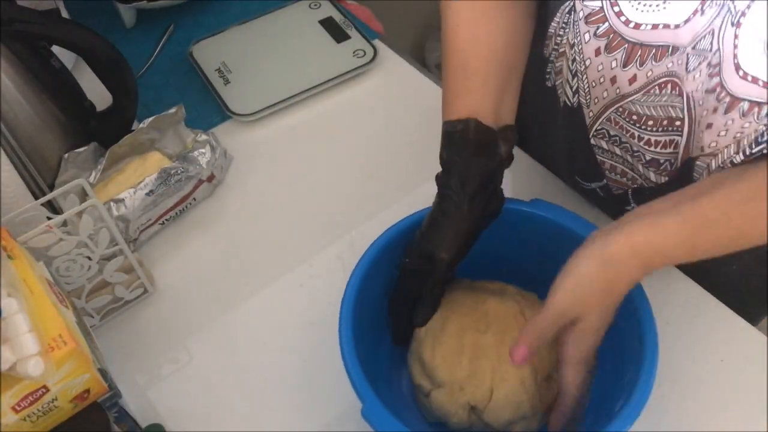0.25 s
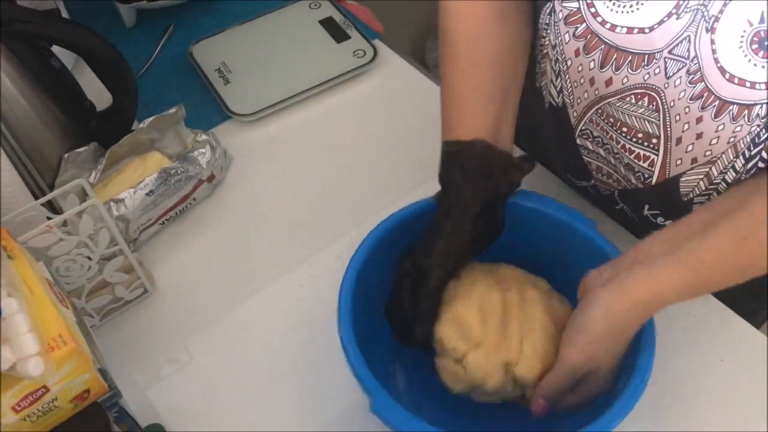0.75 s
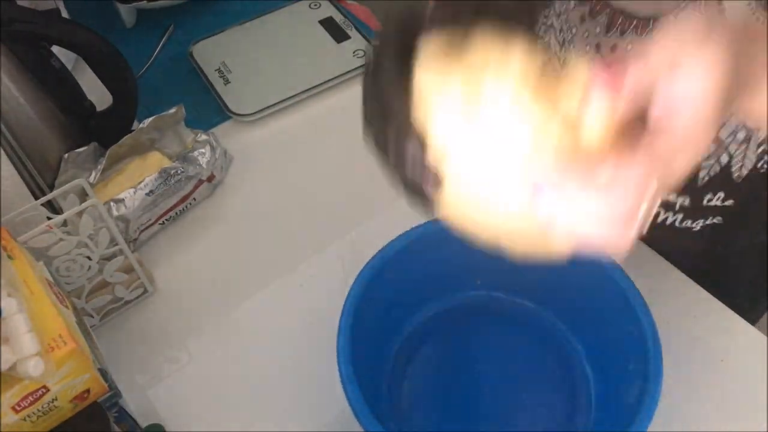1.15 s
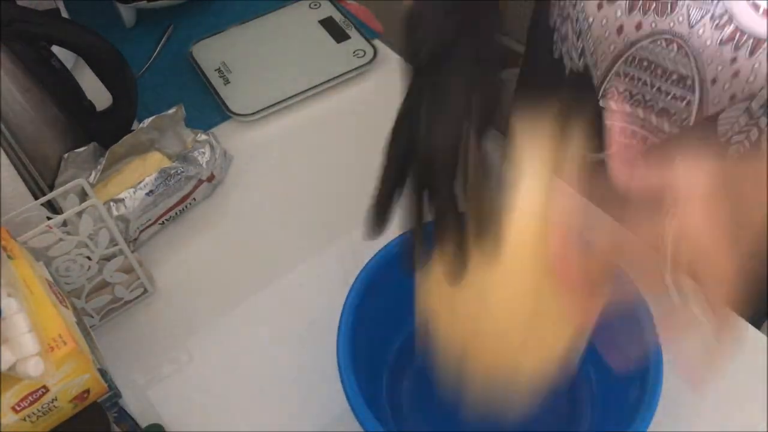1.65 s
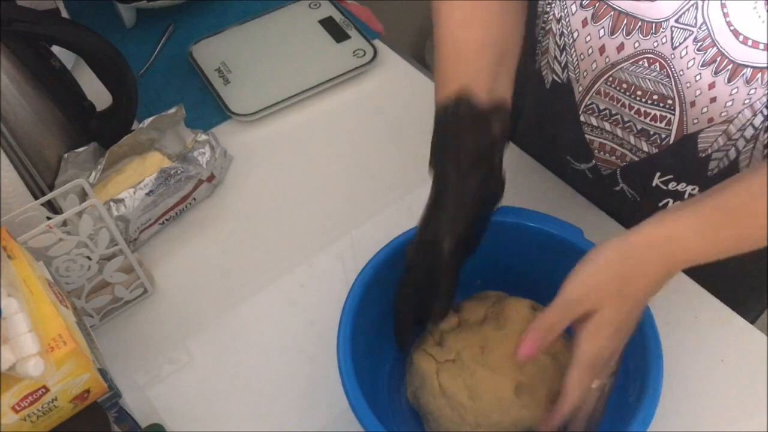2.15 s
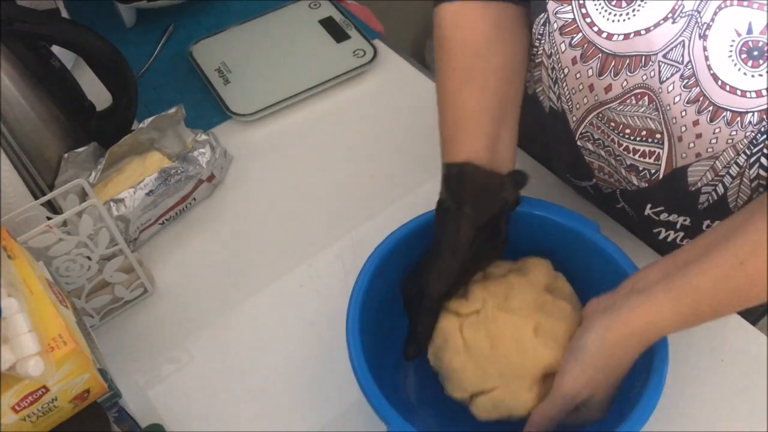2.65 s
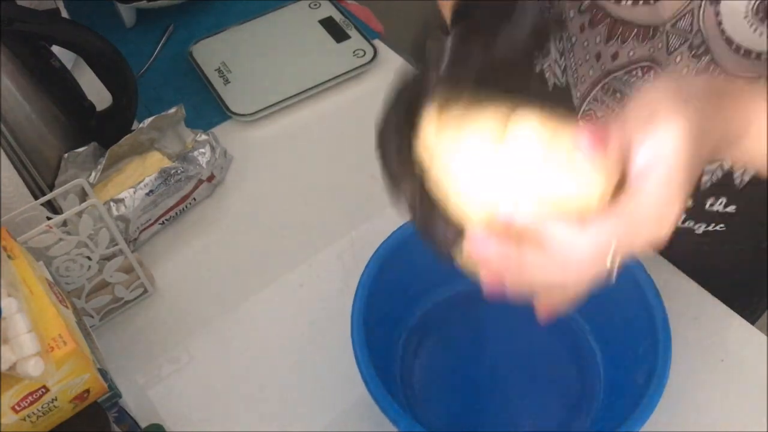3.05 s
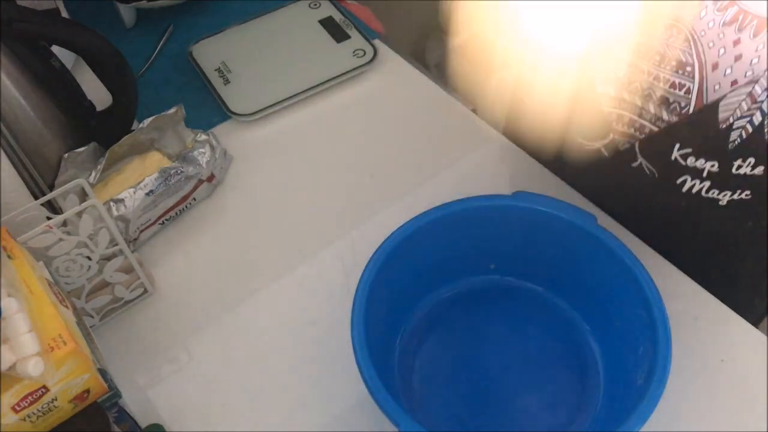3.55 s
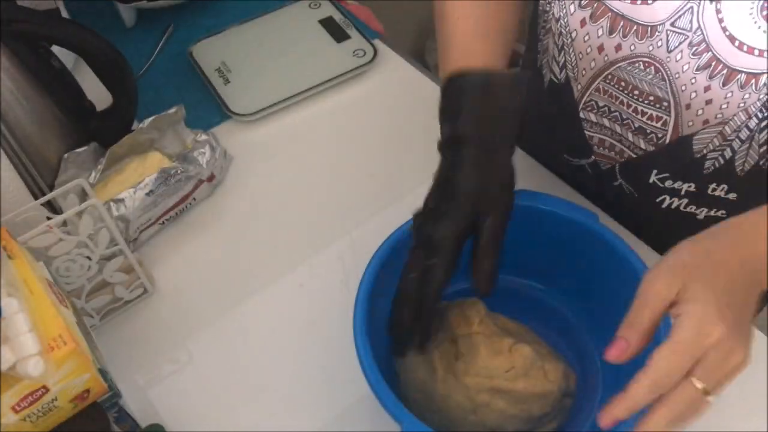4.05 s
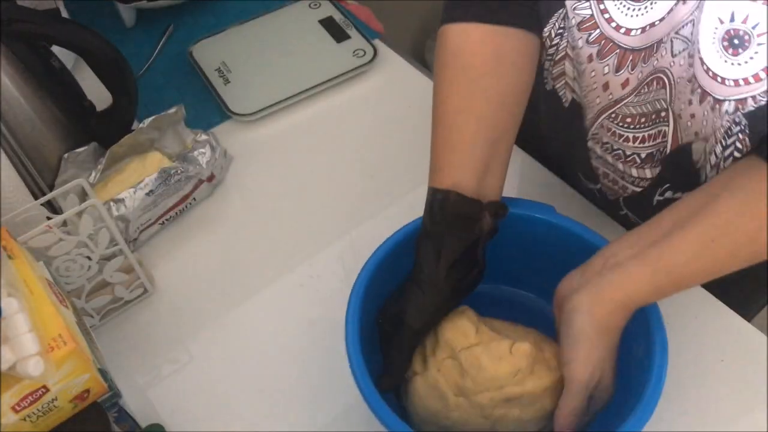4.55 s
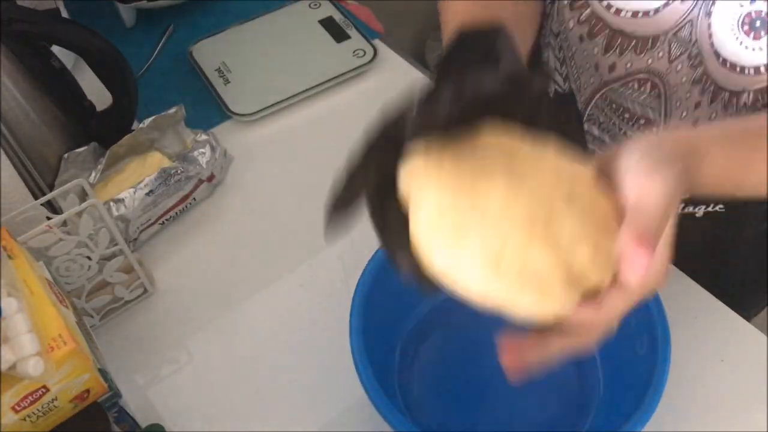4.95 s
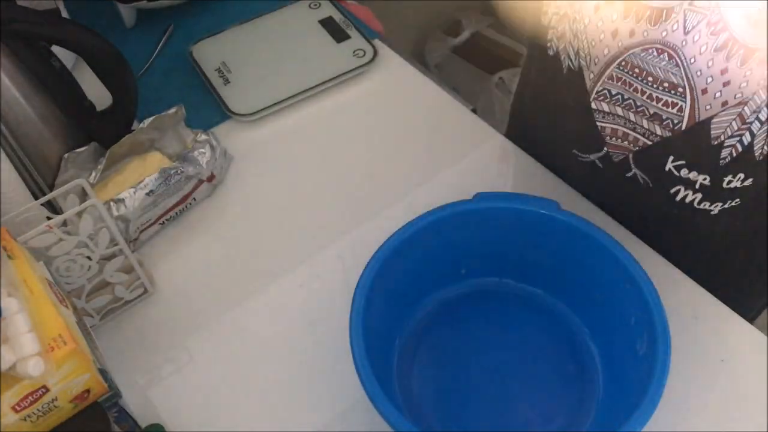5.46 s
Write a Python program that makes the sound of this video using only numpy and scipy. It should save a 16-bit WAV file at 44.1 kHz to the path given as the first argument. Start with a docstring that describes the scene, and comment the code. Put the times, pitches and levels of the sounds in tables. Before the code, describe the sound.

Soft dough is thrown three times into a plastic bowl with loud wet slaps, with light knocks and rustling between throws in an echoing kitchen.

```python
"""In a hard-walled kitchen, soft dough is lifted out of a plastic bowl and thrown back in, three times.
Each landing is a wet slap: a spatter of contacts rings the bowl's modes and one soft push thumps the counter.
Between throws fingers knock the bowl, the bowl rocks, and glove and sticky dough tick and rustle: short noise
bursts through modes and filters. Dense echoes of dying noise surround it, over the low drone of the house.
The microphone input drops the deepest bass, flattens loud peaks and cuts the top treble."""
import sys
import numpy as np
from scipy import signal
from scipy.fft import rfft, irfft
from scipy.io import wavfile

SR = 44100
rng = np.random.default_rng(int(sys.argv[2]) if len(sys.argv) > 2 else 0)


def bounce(signal):
    """Save signal as a 16-bit WAV file at the path given by the first command-line argument."""
    frames = np.transpose(np.atleast_2d(signal))
    limited = np.clip(frames, -1, 1)
    pcm = np.round(limited * 32767).astype(np.int16)
    wavfile.write(sys.argv[1], SR, pcm)


N = 250907  # length in samples


def from_db(db):
    """Gain of a level in dB."""
    return 10 ** (np.asarray(db) / 20)


def rms_one(x):
    """Scaled to unit rms."""
    return x / np.sqrt(np.mean(x ** 2) + 1e-20)


def at_hz(points, hz):
    """A (f/Hz, value) table read on a log-frequency axis."""
    points = np.array(points)
    return np.interp(np.log(np.maximum(hz, 1)), np.log(points[:, 0]), points[:, 1])


def colour(x, spectrum):
    """Filters by a spectrum, keeping the power of white input; minimum phase, so nothing sounds early."""
    hz = np.linspace(0, 1, 1025) * SR / 2
    cepstrum = irfft(np.log(rms_one(from_db(at_hz(spectrum, hz)))))
    # fold the cepstrum onto positive time: this makes the filter minimum phase
    cepstrum[1:1024] *= 2
    cepstrum[1025:] = 0
    impulse = irfft(np.exp(rfft(cepstrum)))
    return signal.fftconvolve(x, impulse)[:N]


def drift(rate):
    """Slow random wander of unit rms: twice-smoothed noise; a higher rate wanders faster."""
    step, settle = 40, 2000  # samples per slow value, slow values discarded
    r = np.exp(-2 * np.pi * step * rate / SR)
    white = rng.standard_normal(N // step + settle + 2)
    slow = signal.lfilter([1], [1, -2 * r, r * r], white)[settle:]
    return np.interp(np.arange(N) / step, np.arange(len(slow)), rms_one(slow))


def body(force, modes):
    """Decaying resonances in parallel; white force of rms 1 gives about rms 1 out."""
    out, power = np.zeros(len(force)), 0
    for k, (hz, level_db, t60) in enumerate(modes):
        r = from_db(-60 / (max(t60, .005) * SR))
        w = 2 * np.pi * hz / SR
        ring = signal.lfilter([0, np.sin(w)], [1, -2 * r * np.cos(w), r * r], force + 1e-18)
        out += (-1) ** k * from_db(level_db) * ring  # neighbours alternate in sign
        power += from_db(2 * level_db) / (2 * (1 - r * r))
    return out / np.sqrt(power)


def bursts(times, levels_db, t60s, rise_s):
    """Envelope of contacts that rise quickly and die away."""
    out = np.zeros(N)
    for s, level_db, t60 in zip(times, levels_db, t60s):
        t60 = np.clip(t60, .002, .3)
        start = round(s * SR)
        t = np.arange(min(int(t60 * SR), N - start)) / SR
        rise = 1 - np.exp(-t / max(rise_s, 1e-5))
        out[start:start + len(t)] += from_db(level_db - 60 * t / t60) * rise
    return out


def grains(per_s, size_db):
    """Random clicks of uneven size and either sign, rms 1."""
    sizes = from_db(size_db * np.minimum(rng.exponential(1, N), 4)) * rng.choice([-1, 1], N)
    return rms_one(sizes * (rng.random(N) < per_s / SR))


# spectrum of the house noise: (f/Hz, level/dB per Hz)
DRONE_SPECTRUM = [(12, -42), (20, 0.5), (134, 1.5), (446, -16.5), (678, -15.5), (1090, -21), (1480, -25),
                  (1760, -27), (2990, -36.5), (5230, -47.5), (7520, -48), (9140, -38.5), (13200, -53.5),
                  (16000, -40.5)]
DRONE_DB = -45.5


def drone():
    """House background: coloured noise, heavy in the bass, with a slightly lumpy level."""
    lumps = from_db(1.2 * drift(12))
    return from_db(DRONE_DB) * lumps * colour(rng.standard_normal(N), DRONE_SPECTRUM)


# how long the room rings: (f/Hz, t60/s)
ROOM_DECAY = [(160, 1), (420, 0.77), (1200, 1), (2000, 0.92), (4000, 0.93), (8000, 0.67), (15000, 0.17)]
FIRST_ECHO_S = 0.0042  # echoes enter at half this delay and are full at one and a half times it
CUPBOARDS_DB, CUPBOARDS_T60_S = 9, 0.23  # stronger early echoes from nearby surfaces


def kitchen(x):
    """Dense echoes: half-octave bands of noise, each dying at its own rate, under a quick early cluster."""
    t = np.arange(int(.9 * SR)) / SR
    white = rng.standard_normal((2, len(t)))
    edges = 40 * 2 ** np.arange(0, 9, .5)
    echoes = 0
    for k, (low, high) in enumerate(zip(edges, edges[1:])):
        band_pass = signal.butter(2, [low, high], "band", fs=SR, output="sos")
        band = signal.sosfilt(band_pass, white[k % 2])
        t60 = max(at_hz(ROOM_DECAY, np.sqrt(low * high)), .05)
        echoes = echoes + band * from_db(-60 * t / t60)
    early = 1 + from_db(CUPBOARDS_DB - 60 * t / CUPBOARDS_T60_S)
    gap = np.clip(t / FIRST_ECHO_S - .5, 0, 1)  # the walls answer after a short gap
    echoes *= early * gap
    return signal.fftconvolve(x, echoes / np.sqrt(np.sum(echoes ** 2)))[:N]


# swish as dough tears off the hands, one row per landing: (lead before landing t/s, level/dB)
# the swish holds 6 dB below the listed level
RELEASES = [(0.11, -33.5), (0.11, -37), (0.11, -34)]
RELEASE_SWELL_S, RELEASE_SWELL_DB, FALL_S = 0.05, 12, 0.0029


def releases():
    """Gain of the tearing swish: silent until its lead, then it swells, holds and stops at the landing."""
    t, out = np.arange(N) / SR, 0
    for (landing_s, *_), (lead_s, level_db) in zip(SLAPS, RELEASES):
        swell = np.clip((t - landing_s + lead_s) / RELEASE_SWELL_S, 0, 1)
        stop = np.clip((landing_s - t) / FALL_S, 0, 1)
        out = out + from_db(level_db - RELEASE_SWELL_DB * (1.5 - swell)) * swell * stop
    return out


# hands at work: (t/s, dough dragging on the wall level/dB, glove rustle level/dB)
HANDS = [(0.0, -53.5, -54), (0.34, -75, -58.5), (0.44, -54, -52), (0.86, -58.5, -53), (0.94, -45, -50),
         (1.09, -49, -54), (1.17, -74, -70), (1.45, -91, -66), (2.15, -80, -55.5), (2.32, -75, -51),
         (2.62, -55.5, -48.5), (2.75, -47, -63), (2.85, -64, -47.5), (3.0, -99, -66), (3.302, -66.5, -63),
         (3.5, -79, -66.5), (4.15, -80, -62.5), (4.3, -55, -55.5), (4.55, -59, -47.5), (4.7, -58, -55.5),
         (4.8, -50, -48), (4.96, -76, -54.5), (5.05, -74, -59.5), (5.3, -68, -71), (5.448, -85, -63),
         (5.69, -85, -72)]
# tone of glove and tearing dough: (f/Hz, level/dB per Hz)
RUSTLE = [(880, -47.5), (1500, -7), (2590, -1.5), (4870, -3.5), (7240, -5), (10000, -10.5), (12700, -7),
          (16000, -11)]
# modes of the free bowl wall: (f/Hz, level/dB, ring t60/s)
WALL = [(880, -22.5, 0.013), (966, -5, 0.042), (1036, -8.5, 0.087), (1142, 0, 0.019), (1330, 0, 0.046),
        (1430, -3.5, 0.054), (1492, -0.5, 0.046), (1632, -1.5, 0.044), (1774, -10, 0.072),
        (1987, 1.5, 0.022), (2245, 0, 0.02), (2320, -3.5, 0.02), (2495, -4.5, 0.02), (2747, -7.5, 0.051),
        (2966, -8, 0.032), (3230, -11.5, 0.013)]
# modes of the air and base of the bowl: (f/Hz, level/dB, ring t60/s)
HOLLOW = [(205, -2.5, 0.1), (429.6, 2.5, 0.055), (607, -5.5, 0.12), (653, -2, 0.063)]
HUM_UNDER_DRAG_DB = 11.5  # how far the hollow lies under the dragged wall
RELEASE_WALL_DB = -9.5  # share of the swish that rings the bowl


def hands():
    """Dragging dough excites the bowl in clumps; the glove hisses and crackles finely."""
    s, *levels_db = np.transpose(HANDS)
    drag, rustle = [from_db(np.interp(np.arange(N) / SR, s, db)) for db in levels_db]
    swish = releases()
    drag = drag + from_db(RELEASE_WALL_DB) * swish
    clumps = from_db(5.3 * drift(25)) * grains(1900, size_db=4.0)
    hiss = from_db(-1.0 + 2.88 * drift(30)) * grains(5000, size_db=3.0)
    tearing = from_db(2.5 * drift(70)) * grains(7000, size_db=2.5)
    crackle = from_db(-6.5) * grains(210, size_db=2.5)
    wall = body(drag * clumps, WALL)
    hollow = body(drag * clumps, HOLLOW) / from_db(HUM_UNDER_DRAG_DB)
    return wall + hollow + colour(rustle * (hiss + crackle) + swish * tearing, RUSTLE)


# dough shifting in the raised hands crackles faintly: (start t/s, end t/s)
SHIFTS = [(1.29, 1.48), (3.2, 3.45), (5.16, 5.33)]
SNAPS_PER_S = 150
SNAP_DB, SNAP_SPREAD_DB, SNAP_COLOUR_DB = -41, 3.5, 11  # mean level, spread of level, spread of brightness


def faint_ticks():
    """Random snaps while the dough shifts, each with its own strength and colour."""
    t = np.arange(N) / SR
    shifting = np.any([(t > start) & (t < end) for start, end in SHIFTS], axis=0)
    born = shifting & (rng.random(N) < SNAPS_PER_S / SR)
    strength, tint = rng.standard_normal((2, N))
    return np.transpose([t, SNAP_DB + SNAP_SPREAD_DB * strength, SNAP_COLOUR_DB * tint])[born]


# clearest snaps of dough and glove letting go: (t/s, level before filtering/dB, brighter over duller part/dB)
TICKS = [(0.7866, -27, -2), (0.9004, -26, 2), (0.9193, -27.5, 4), (1.056, -21, -14), (1.1936, -35, -1),
         (1.3407, -36, 15), (1.3962, -31, -9), (1.4182, -40, 5), (1.4437, -34, 10), (1.6528, -31.5, -18),
         (1.7345, -32, 11), (2.4737, -26.5, 3), (2.5416, -21, 0), (2.5728, -22.5, 10), (2.9416, -27, -3),
         (2.9663, -23.5, -11), (3.02, -30.5, -9), (3.1474, -34.5, -6), (3.2183, -45, 9), (3.275, -31, 15),
         (3.3529, -25.5, -0.5), (3.3855, -24.5, -4.5), (3.4059, -27.5, -6.5), (3.436, -32.5, -20),
         (3.472, -21, -5.5), (4.0746, -28, -10), (4.1521, -28.5, 11), (4.573, -19.5, -22), (4.5894, -40, 6),
         (4.709, -23.5, -5), (4.9377, -25, 5), (5.0119, -25.5, -6), (5.0468, -26.5, -12.5),
         (5.236, -25, -12), (5.25, -27.5, -20), (5.3643, -24.5, -11), (5.5194, -38, 1), (5.5881, -20, -8)]


def ticks():
    """Each snap is a tiny tear with a duller and a brighter part; the counter returns it a moment later."""
    s, level_db, bright_db = np.vstack([TICKS, faint_ticks()]).T
    t60 = rng.uniform(.003, .007, len(s))
    duller = (-np.maximum(bright_db, 0), [2400, 6200])
    brighter = (np.minimum(bright_db, 0), [6500, 15000])
    out = 0
    for part_db, band_hz in (duller, brighter):
        snaps = bursts(s, level_db + part_db, t60, rise_s=.00005) * rng.choice([-1, 1], N)
        out = out + signal.sosfilt(signal.butter(2, band_hz, "band", fs=SR, output="sos"), snaps)
    smear = rng.standard_normal(130) * np.hanning(130)
    reflection = np.r_[np.zeros(100), smear]  # delay in samples, then a short blur
    return out + from_db(-33.5) * signal.fftconvolve(out, reflection)[:N]


# the bowl rocks when the dough leaves it, and after a landing:
# (start t/s, length t/s, wall level/dB, hollow level/dB, fading/dB per s)
ROCKS = [(0.972, .195, -22, -29.5, 52), (1.952, .28, -21, -43, 33), (2.817, .07, -18, -28, 155),
         (3.903, .2, -22.5, -44, 43), (4.792, .11, -16, -20.5, 71)]
ROCK_S, ROCK_SPREAD_DB = 0.015, 2  # mean gap between bumps, unevenness


def rocks():
    """Soft bumps of the base ring mostly the middle modes of the free wall, and the hollow."""
    bumps = []
    for start, length, wall_db, hollow_db, fading in ROCKS:
        jitter, wall_luck, hollow_luck = rng.standard_normal((20, 3)).T
        after = ROCK_S * (np.arange(len(jitter)) + 0.246 * jitter)
        wall_levels = wall_db - fading * after + ROCK_SPREAD_DB * wall_luck
        hollow_levels = hollow_db - fading * after + ROCK_SPREAD_DB * hollow_luck
        bumps += list(np.transpose([start + after, wall_levels, hollow_levels])[after < length])
    s, wall_db, hollow_db = np.transpose(bumps)
    t60 = np.full(len(s), .015)
    # modes away from the centre are struck less, and all ring shorter
    middle = [(hz, db - 18 * np.log2(hz / 1480) ** 2, 0.69 * ring) for hz, db, ring in WALL]
    base = [(hz, db - 12 * np.log2(hz / 434) ** 2, 0.64 * ring) for hz, db, ring in HOLLOW]
    wall = body(bursts(s, wall_db, t60, rise_s=0.0013) * rng.standard_normal(N), middle)
    hollow = body(bursts(s, hollow_db, t60, rise_s=0.00083) * rng.standard_normal(N), base)
    return wall + hollow


# fingers and dough knocking the bowl: (t/s, wall level/dB, hollow level/dB, crack level/dB)
KNOCKS = [(0.396, -21, -26, -20.5), (0.4125, -30, -38, -29.5), (0.4427, -62, -37, -32),
          (0.5379, -45, -35, -26), (0.566, -58, -32, -34.5), (0.6712, -33, -53, -35.5),
          (0.6918, -28, -53, -36), (0.881, -22, -54, -26), (0.9436, -27, -49, -37), (0.9629, -14, -40, -22),
          (1.029, -36, -25, -33.5), (1.0711, -31.5, -24, -31.5), (1.086, -20.5, -31, -49),
          (2.3135, -30.5, -44, -24), (2.3245, -20, -50, -30), (2.3932, -40, -57, -31.5),
          (2.533, -26.5, -32, -26.5), (2.5604, -17.5, -57, -26.5), (2.721, -30, -39, -42),
          (2.7474, -36.5, -37, -37.5), (2.8073, -16.5, -34, -27), (2.815, -18, -19, -20.5),
          (4.247, -24.5, -48, -76), (4.2593, -26, -55, -41), (4.2837, -30, -58, -50),
          (4.3467, -25.5, -79, -28.5), (4.364, -21.5, -57, -35.5), (4.4212, -39, -46, -36),
          (4.5334, -40, -44, -31), (4.7373, -15, -20.5, -31.5), (4.778, -7.5, -7, -13.5),
          (4.826, -14.5, -22, -21.5), (5.5393, -42, -53.5, -40)]
# tone of the crack on top of knocks and slaps: (f/Hz, level/dB per Hz)
CRACK = [(1180, -5.5), (2000, -2.5), (3610, -5.5), (4260, -6), (5300, -14), (6360, -9), (7120, -14.5),
         (13400, -20.5), (16000, -14)]
KNOCK_T60_S, KNOCK_RISE_S = 0.029, 0.0011
KNOCK_ON_COUNTER_DB = -14  # share of the hollow's blow that passes through the base


def knocks():
    """Short contacts ring the wall, the hollow and the counter, with a crack on top."""
    s, wall_db, hollow_db, crack_db = np.transpose(KNOCKS)
    t60 = np.full(len(s), KNOCK_T60_S)
    contacts = grains(8000, size_db=2.5)
    wall = body(bursts(s, wall_db, 0.74 * t60, 2 * KNOCK_RISE_S) * contacts, WALL)
    blows = bursts(s, hollow_db, t60, rise_s=0.0043) * rng.standard_normal(N)
    hollow = body(blows, HOLLOW)
    counter = from_db(KNOCK_ON_COUNTER_DB) * body(blows, COUNTER[1:])  # without the deepest mode
    snap = bursts(s, crack_db, t60, KNOCK_RISE_S) * grains(14000, size_db=3.5)
    return wall + hollow + counter + colour(snap, CRACK)


# modes of the counter top: (f/Hz, level/dB, ring t60/s)
COUNTER = [(55.5, 10.5, 0.15), (145, -5.5, 0.32), (210.7, 2.5, 0.23)]


def thumps():
    """The weight of the dough is one soft, smooth push whose change rings the counter."""
    s, thump_db = np.transpose(SLAPS)[[0, 5]]
    weight = bursts(s + 0.0083, thump_db, np.full(len(s), .016), rise_s=0.014)
    return body(np.diff(weight, prepend=0), COUNTER)


# dough landings: (t/s, wall level/dB, wall tilt/dB per octave, hollow level/dB, wet crack level/dB,
# push on the counter level/dB, spreading t60/s, graze relative to wall level/dB)
SLAPS = [(1.8141, 2.5, -11, -15, -5.5, 39, 0.097, -19), (3.7618, 1, -5, -5.5, -3, 37.5, 0.06, -34),
         (5.678, 4.5, -18, -30, -1.5, 22, 0.043, -26)]
# change of each hollow mode with the dough lying on the base: one level/dB per mode
FILLED_DB = [-4, -6, 2, 2]


def slaps():
    """The dough grazes the bowl, then spreads over the base in a spatter of contacts."""
    s, wall_db, tilt_db, hollow_db, crack_db, _, t60, graze_db = np.transpose(SLAPS)
    damping, graze_s = .3, .01  # dough shortens the ring; the graze leads by graze_s
    spatter, wall = grains(9000, size_db=3.0), np.zeros(N)
    for k in range(len(SLAPS)):
        # the landing spot picks the modes, the dough damps them
        struck = [(hz, db + tilt_db[k] * np.log2(hz / 1000), damping * ring) for hz, db, ring in WALL]
        force = bursts(s[[k]], wall_db[[k]], t60[[k]], rise_s=0.0037)
        force += bursts(s[[k]] - graze_s, wall_db[[k]] + graze_db[k], [2 * graze_s], rise_s=0.00083)
        near = slice(round((s[k] - graze_s) * SR), round((s[k] + .5) * SR))
        wall[near] += body((force * spatter)[near], struck)
    filled = [(hz, db + change_db, 2 * damping * ring)
              for (hz, db, ring), change_db in zip(HOLLOW, FILLED_DB)]
    hollow = body(bursts(s, hollow_db, t60, rise_s=0.0037) * rng.standard_normal(N), filled)
    wet_crack = bursts(s, crack_db, t60, rise_s=0.00078) * grains(12000, size_db=-1.0)
    return wall + hollow + colour(wet_crack, CRACK)


SIDES = 4  # directions in which the splat leaves the bowl
KITCHEN_DB = -6  # echoes against direct sound
HANDLING_ECHO_DB = -4.5  # echo level of the handling sounds, lower than that of the slaps


def scene():
    """Everything at the bowl sounds into the kitchen; each side of a splat has its own spatter and echoes."""
    handling = knocks() + rocks() + ticks() + hands()
    handling_echoes = from_db(HANDLING_ECHO_DB) * kitchen(handling)
    slap_echoes = sum(kitchen(slaps()) for side in range(SIDES)) / np.sqrt(SIDES)
    direct = slaps() + thumps() + handling
    return (direct + from_db(KITCHEN_DB) * (handling_echoes + slap_echoes) + drone())[None, :]


OVERLOAD, CUTOFF_HZ = .98, 15800  # amplitude that peaks flatten towards, top of the treble


def record(dry):
    """The microphone drops the deepest bass, loud peaks overload the input and flatten; the top is cut."""
    heard = signal.sosfilt(signal.butter(2, 38, "high", fs=SR, output="sos"), dry)
    flat = heard / (1 + np.abs(heard / OVERLOAD) ** 4) ** .25
    low_pass = signal.ellip(10, .3, 60, CUTOFF_HZ, fs=SR, output="sos")
    return np.clip(signal.sosfilt(low_pass, flat), -1, 1)


dry = scene()
out = record(dry)
bounce(out)
```